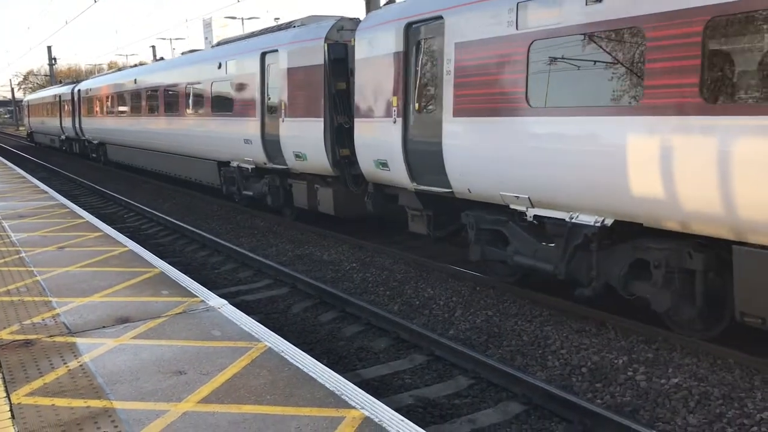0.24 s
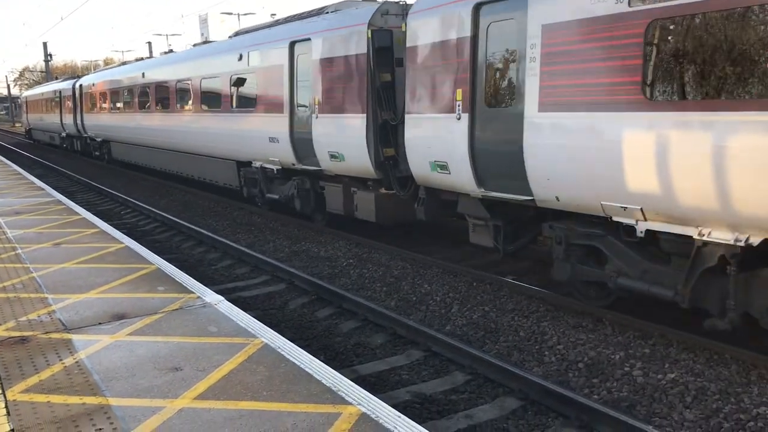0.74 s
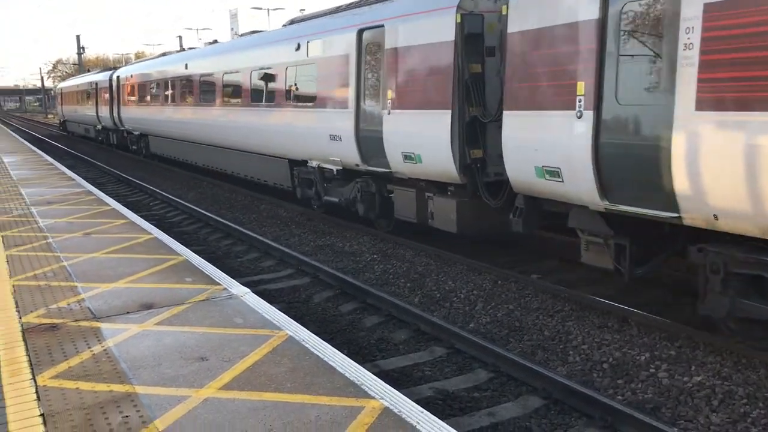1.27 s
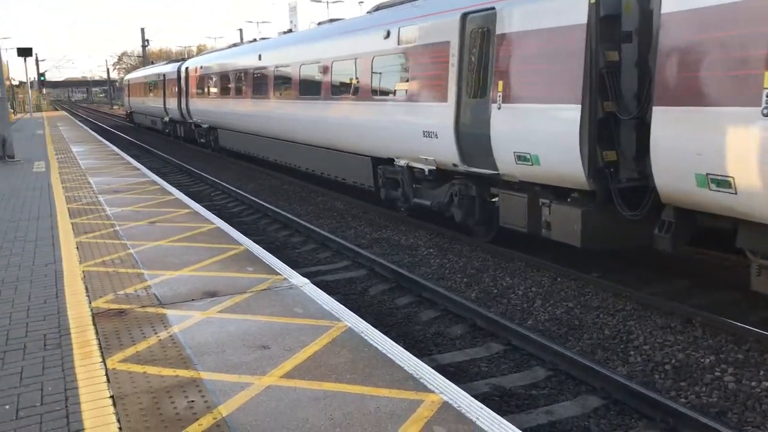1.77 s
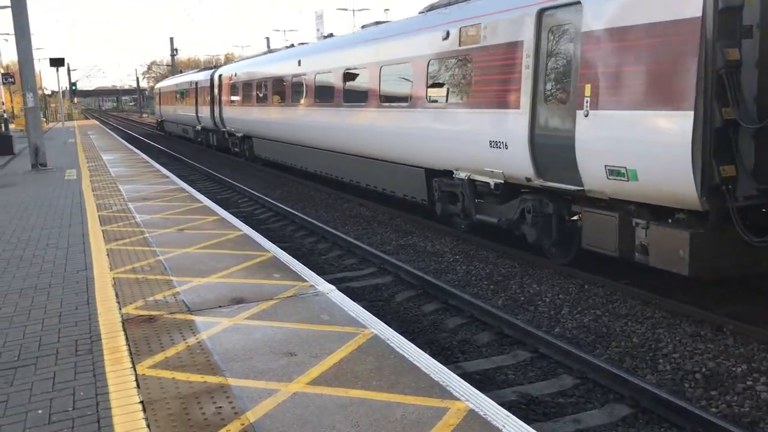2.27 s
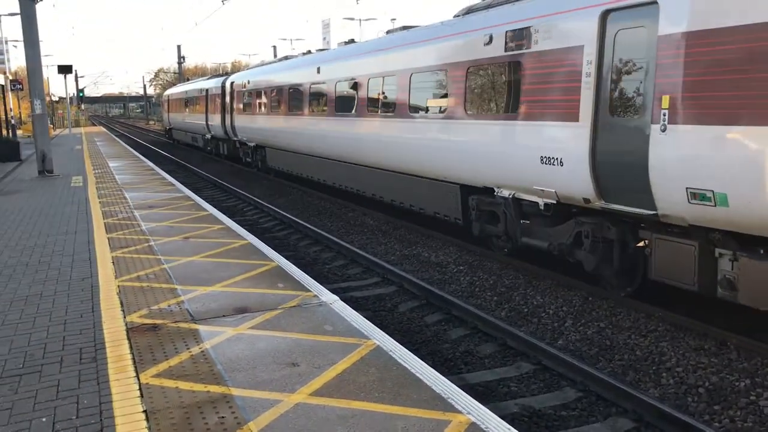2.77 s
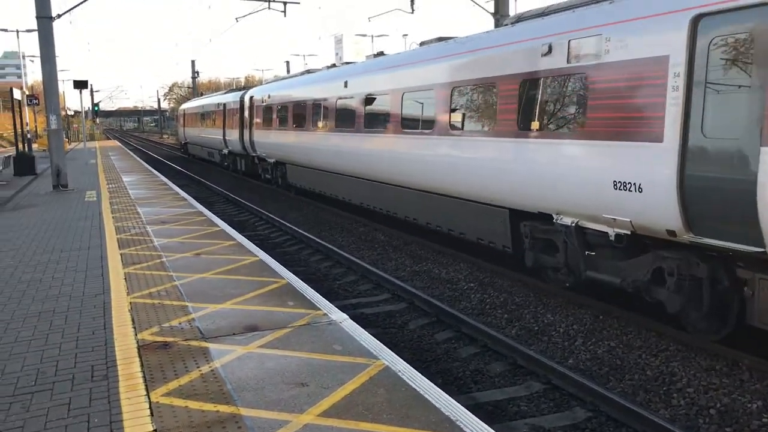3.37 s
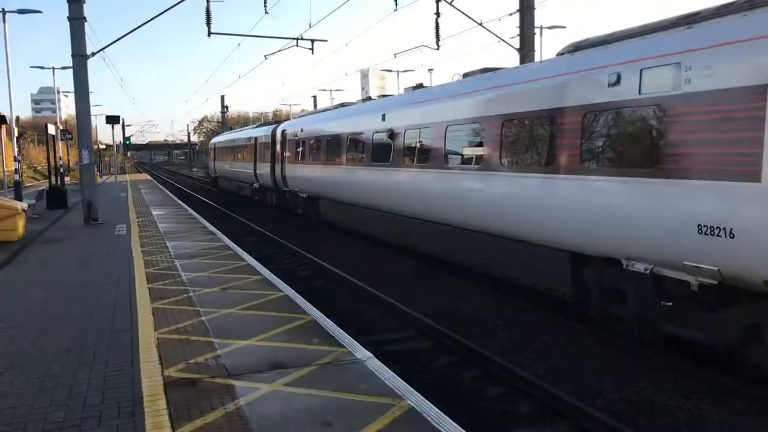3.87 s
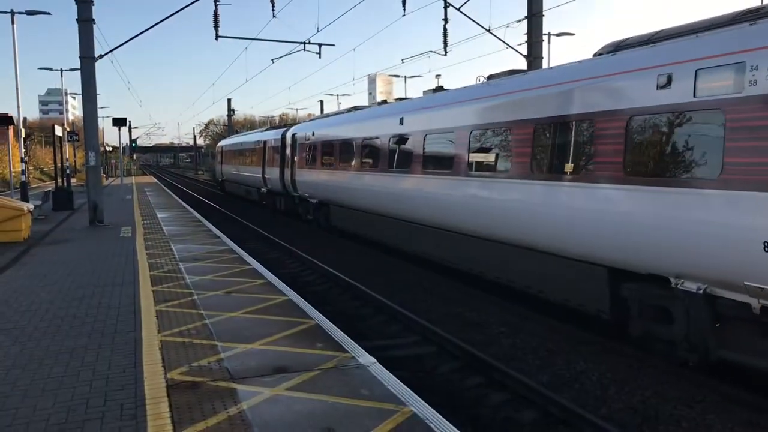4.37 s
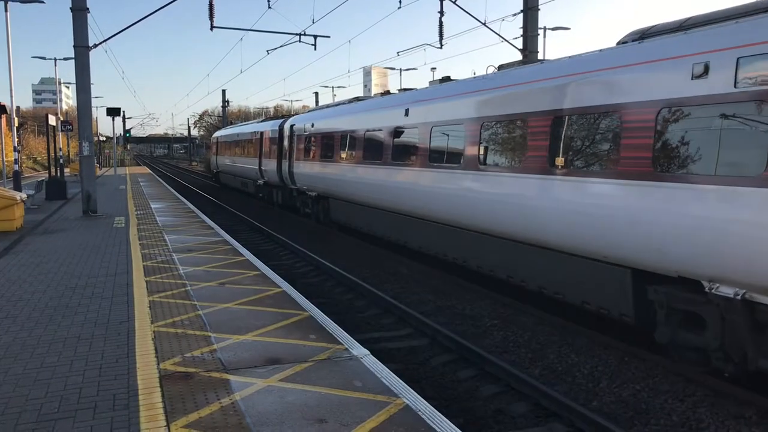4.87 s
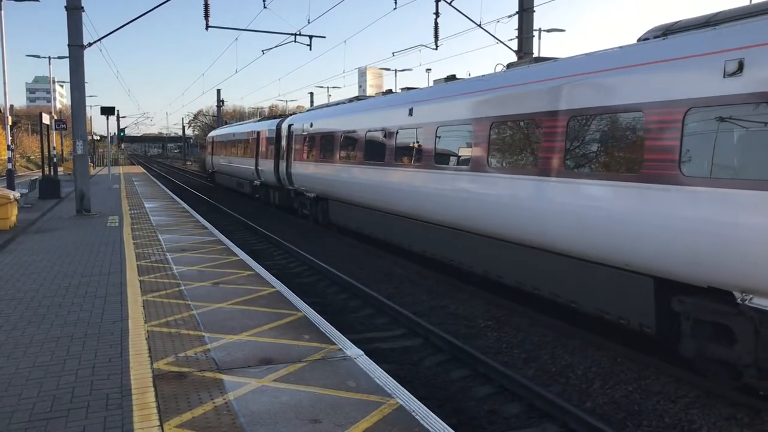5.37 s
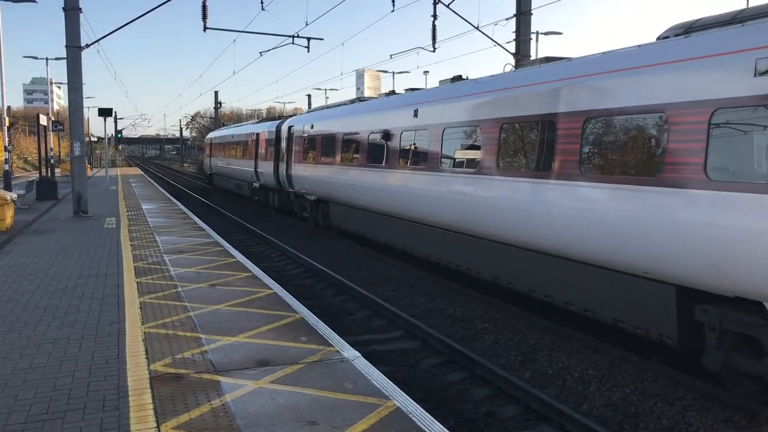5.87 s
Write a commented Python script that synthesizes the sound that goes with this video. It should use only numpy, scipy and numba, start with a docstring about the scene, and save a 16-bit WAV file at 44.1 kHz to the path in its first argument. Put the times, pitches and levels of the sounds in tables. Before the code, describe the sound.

A passenger train brakes past an open station platform. Dozens of short wavering squeaks merge into one continuous shrill squeal with scraping and thin hiss, single chirps standing out. Wind thumps the microphone in a cluster early on and again midway. Soft wheel rumble and a barely audible motor whine lie beneath. Toward the end the squeal loosens into lower, wandering notes. Close phone microphone, mono, very short echo.

```python
"""A station platform: a passenger train brakes along it, heard by a phone with one microphone.
Dozens of brake pads squeak at once in short wavering whistles that merge into one high squeal, over
the scrape of pads that catch no pitch; single squeaks and wandering held notes stand out.
Gusts buffet the microphone in low thumps (damped swings and airflow noise), the wheels rumble as
smooth shaped noise, and the traction gear whines faintly as three steady tones."""
import sys
import numpy as np
from scipy import signal
from scipy.fft import rfft, irfft
from scipy.io import wavfile
from scipy.ndimage import uniform_filter1d
from numba import njit

SR = 44100
rng = np.random.default_rng(int(sys.argv[2]) if len(sys.argv) > 2 else 0)


def pcm_store(signal):
    """Save signal as 16-bit PCM."""
    levels = np.round(np.clip(np.atleast_2d(signal), -1, 1) * 32767)
    wavfile.write(sys.argv[1], SR, levels.astype(np.int16).T)


N = 270774


def undb(db):
    """Decibels to gain."""
    return 10 ** (np.asarray(db) / 20)


def unit(x):
    """Scale to an RMS of 1."""
    return x / np.sqrt(np.mean(x ** 2))


def curves(table):
    """Columns of a curve table, one value a sample."""
    s, *columns = np.transpose(table)
    return [np.interp(np.arange(N) / SR, s, column) for column in columns]


def db_at(spectrum, hz):
    """Read a spectrum table at any pitch, along a logarithmic frequency axis."""
    points, db = np.transpose(spectrum)
    return np.interp(np.log(np.maximum(hz, 1)), np.log(points), db)


def colour(x, spectrum):
    """Shape a long sound by (frequency [Hz], level [dB]) points."""
    hz = np.arange(N // 2 + 1) * SR / N
    return irfft(rfft(x) * undb(db_at(spectrum, hz)), N)


def walk(rate):
    """Random levels of RMS 1, held 1 / rate s and slewed twice."""
    k = int(SR / rate)
    steps = np.repeat(rng.standard_normal(N // k + 1), k)
    return unit(uniform_filter1d(uniform_filter1d(steps, k), k)[:N])


THIRD_DB = -3  # third harmonic of a squeak relative to its second
# What reaches the phone of the upper partials: (frequency [Hz], relative level [dB])
OVERTONES = [(3710, -9), (6300, -13), (6670, -10.5), (7170, 1), (8720, 2.5), (9890, 0.5), (10600, -11.5),
             (11200, -10), (14500, -12), (15700, -15)]
OVERTONE_DB, UPPER_FLICKER_DB = -38.5, 1.93  # level at the start; depth of the treble flicker
RUB_DB, SIZZLE_DB = -5.5, -42  # scrape against the crowd curve; hiss before it follows the crowd


def brakes():
    """Brake pads stick and slip into a crowd of squeaks, clear notes, scraping and treble hiss."""
    slowing = np.linspace(0, 1, N) ** 2
    wobble, tremble = 1 + 0.00553 * walk(90), undb(1.72 * walk(70))
    level_db, high_db, low_db = crowd_levels()
    crowd_low, crowd_high = crowd(high_db, low_db, slowing, wobble, tremble, level_db)
    clear_low, clear_high = clear_notes(slowing, wobble, tremble)
    partials = unit(colour(crowd_high + 0.73 * clear_high, OVERTONES))
    upper = undb(OVERTONE_DB - 2.7 * slowing) * partials
    scrape = undb(RUB_DB + level_db - 4 * slowing) * rubbing(.45 * high_db, low_db)
    hiss = undb(SIZZLE_DB + 0.2 * (level_db - level_db.mean())) * sizzle()
    treble = undb(UPPER_FLICKER_DB * walk(9)) * (upper + hiss)
    return crowd_low + clear_low + scrape + treble


# The crowd of pads before trim and flicker; only the movement of the last two columns counts:
# (time [s], level [dB], highest pads [dB], lowest pads [dB])
CROWD = [(0.0, -25, -3, -21), (0.15, -27, -8, -17.5), (1.08, -21.5, -7, -21.5), (1.13, -23.5, -14.5, -14.5),
         (1.49, -24, -7, -14), (2.17, -22.5, -14.5, -17.5), (2.5, -24.5, -10, -13),
         (2.56, -23, -12.5, -18.5), (3.25, -23, -5, -21), (3.79, -20, -12.5, -25.5),
         (4.34, -22.5, -10.5, -15), (4.86, -24.5, -17, -11.5), (5.01, -25, -15, -21), (5.03, -25, -13, -9),
         (5.23, -21.5, -24.5, -19), (5.88, -22, -30, -15.5), (6.07, -20, -19, -23), (6.14, -25, -19, -7)]
SURGE_DB, FRINGE_DB = 0.52, 2.5  # how far the level and the two edges of the crowd flicker


def crowd_levels():
    """The edges of the crowd come and go as different bogies pass."""
    level_db, high_db, low_db = curves(CROWD)
    level_db = level_db + SURGE_DB * walk(14)
    high_db = high_db - high_db.mean() + FRINGE_DB * walk(12)
    low_db = low_db - low_db.mean() + FRINGE_DB * walk(12)
    return level_db, high_db, low_db


# How strongly the pads sing at each pitch: (frequency [Hz], relative level [dB])
PADS = [(1710, -55), (2900, -28.5), (3120, -25.5), (3260, -23.5), (3610, -9.5), (4060, -3), (4230, -0.5),
        (4960, -2.5), (5200, -5), (5430, -4.5), (6500, -27), (8450, -101), (14300, -120)]
CROWD_PER_S, CROWD_TRIM_DB = 900, -2.5  # squeaks drawn, before some fall silent; whistles against the curve


def crowd(high_db, low_db, slowing, wobble, tremble, level_db):
    """Short random squeaks: as the discs slow, fewer pads sing but each holds its note longer."""
    chance = rng.random((int(CROWD_PER_S * N / SR), 8)).T
    s = chance[0] * (N / SR + .1) - .1
    hz = 2900 + 3600 * chance[1]
    at = np.clip(s * SR, 0, N - 1).astype(int)
    high, low = edges(hz)
    db = db_at(PADS, hz) + 3.3 * chance[2] + high * high_db[at] + low * low_db[at]
    length = (.015 + .03 * chance[5]) * (1 + .8 * slowing[at])
    db[chance[7] < .45 * slowing[at]] = -200  # ever fewer pads sing
    bend = 1 + .045 * (1 + .7 * slowing[at]) * (chance[3:5] - .5)
    phase = 2 * np.pi * chance[6]
    rows = np.transpose([s, length, hz * bend[0], hz, hz * bend[1], undb(db), phase])
    low_part, high_part = whistle(rows, wobble, tremble, undb(THIRD_DB))
    swell = undb(level_db + CROWD_TRIM_DB) / np.std(low_part)
    return swell * low_part, swell * high_part


# Squeaks that stand out of the crowd, before their stutter:
# (time [s], length [s], pitch [Hz], level [dB])
SQUEAKS = [(0.21, 0.05, 4520, -24), (0.358, 0.11, 6150, -35), (0.521, 0.071, 6100, -26.5),
           (0.538, 0.061, 6230, -28), (0.73, 0.1, 3820, -37), (0.87, 0.055, 5970, -23),
           (0.894, 0.052, 3990, -21.5), (1.173, 0.065, 5870, -25.5), (1.225, 0.038, 3910, -22),
           (1.307, 0.041, 6070, -31), (1.354, 0.08, 5230, -27), (1.363, 0.046, 4720, -21),
           (1.366, 0.065, 5910, -30), (1.447, 0.054, 3960, -28.5), (1.506, 0.06, 5820, -29),
           (1.542, 0.054, 4650, -24), (1.554, 0.08, 5710, -28), (1.652, 0.047, 4780, -24),
           (1.695, 0.056, 5790, -20), (1.726, 0.083, 5410, -20), (1.824, 0.061, 3900, -28),
           (1.832, 0.03, 4840, -19), (1.86, 0.032, 3280, -32), (1.941, 0.033, 4320, -21),
           (2.024, 0.051, 3670, -29), (2.04, 0.045, 5330, -23), (2.264, 0.056, 4330, -22.5),
           (2.565, 0.032, 5070, -20), (2.611, 0.036, 5120, -18), (2.636, 0.034, 4970, -13.5),
           (2.743, 0.037, 4730, -20), (2.78, 0.076, 5180, -19.5), (2.848, 0.06, 5110, -18),
           (3.002, 0.047, 5250, -16.5), (3.02, 0.081, 5420, -20), (3.083, 0.039, 5300, -17.5),
           (3.208, 0.048, 4850, -17), (3.274, 0.048, 5850, -28), (3.295, 0.036, 5280, -20),
           (3.356, 0.046, 5120, -18), (3.468, 0.051, 4910, -25), (3.525, 0.046, 4580, -22),
           (3.573, 0.063, 5380, -20.5), (3.635, 0.093, 5270, -17.5), (3.812, 0.051, 5460, -26),
           (3.896, 0.04, 5310, -17), (3.933, 0.097, 5240, -21.5), (4.183, 0.038, 4070, -22.5),
           (4.384, 0.042, 4800, -21), (4.605, 0.098, 3270, -35), (4.614, 0.067, 4450, -28),
           (4.66, 0.12, 5710, -37), (4.771, 0.066, 3650, -20.5), (4.847, 0.031, 3130, -35),
           (5.055, 0.054, 3750, -23.5), (5.08, 0.068, 4270, -17.5), (5.165, 0.071, 3950, -22.5),
           (5.212, 0.091, 3670, -22.5), (5.301, 0.036, 3720, -18.5), (5.321, 0.069, 3460, -33),
           (5.536, 0.042, 3850, -20), (5.562, 0.063, 4260, -25), (5.608, 0.069, 4940, -29),
           (5.625, 0.062, 4710, -19), (5.764, 0.047, 4505, -27), (5.85, 0.12, 4270, -22),
           (5.874, 0.088, 5380, -30), (5.968, 0.046, 4130, -26), (5.99, 0.068, 5250, -27),
           (6.057, 0.061, 4960, -27)]
SQUEAK_BEND, SQUEAK_ARCH = .04, .022  # random tilt and lean of the ends, as shares of the pitch
CENTRE_HZ = 4900  # the ends lean towards this pitch
STUTTER_DB = 3.5  # how unevenly a clear squeak grips at speed


def clear_notes(slowing, wobble, tremble):
    """Single bent squeaks and held notes, whose grip stutters less as the train slows."""
    ends = 1 + SQUEAK_BEND * (rng.random((len(SQUEAKS), 2)) - .5)
    ends = ends + SQUEAK_ARCH * np.sign(CENTRE_HZ - np.array(SQUEAKS)[:, 2:3])
    rows = np.array([(t, length, hz * start, hz, hz * end, undb(db), 0.)
                     for (t, length, hz, db), (start, end) in zip(SQUEAKS, ends)])
    grip = tremble * undb(STUTTER_DB * (1 - 0.45 * slowing) * (walk(110) - .5))
    return np.array(whistle(rows, wobble, grip, undb(THIRD_DB))) + held(wobble, grip)


@njit
def whistle(rows, wobble, tremble, third):
    """Each row swells, bends through three pitches and fades; fundamentals and upper partials apart."""
    low, high = np.zeros(N), np.zeros(N)
    for s, length, a, b, c, gain, phase in rows:
        i0, n = int(s * SR), int(length * SR)
        for j in range(max(0, -i0), min(n, N - i0)):
            u = j / n
            own = (i0 + j + n * 7) % N  # the length picks which stretch of wavering a squeak gets
            hz = a * (1 - u) * (1 - 2 * u) + 4 * b * u * (1 - u) + c * u * (2 * u - 1)
            phase += 2 * np.pi * hz * wobble[own] / SR
            z = np.exp(1j * phase)  # its powers are the harmonics
            g = gain * np.sin(np.pi * u) ** .45 * tremble[own]
            low[i0 + j] += g * z.imag
            high[i0 + j] += g * ((z * z).imag + third * (z * z * z).imag)
    return low, high


# Pads that hold a wandering note as the train slows, before rounding and stutter, one curve each:
# (time [s], pitch [Hz], level [dB])
HELD = [
    [(0.66, 5780, -35), (0.84, 5800, -33), (1.07, 5800, -25.5), (1.13, 5800, -40), (1.2, 5840, -36),
     (1.3, 5900, -37), (1.48, 5830, -30), (1.64, 5650, -36), (1.72, 5770, -32), (1.8, 5800, -45),
     (1.94, 5760, -26), (2.06, 5600, -34)],
    [(4.22, 5620, -18), (4.3, 5340, -34), (4.4, 5020, -30), (4.5, 5060, -23.5), (4.56, 5280, -25.5),
     (4.605, 4880, -23), (4.66, 4880, -17), (4.71, 5240, -21), (4.8, 5285, -32), (4.875, 5040, -21),
     (4.95, 5130, -26), (5.03, 5270, -20.5), (5.08, 4760, -21), (5.13, 4870, -27), (5.17, 5110, -21),
     (5.24, 5170, -28), (5.29, 4830, -32)],
    [(5.15, 5770, -35), (5.23, 5770, -28), (5.32, 5850, -36), (5.45, 5840, -40), (5.54, 5780, -32.5),
     (5.63, 5720, -40), (5.86, 5780, -40)],
    [(5.015, 3540, -22), (5.045, 3330, -26), (5.085, 3350, -25), (5.115, 3540, -26)],
    [(5.2, 4240, -28), (5.26, 4060, -29), (5.34, 4230, -28), (5.42, 4420, -14)],
    [(5.49, 3700, -25), (5.56, 3580, -28), (5.6, 3160, -41)],
    [(5.59, 3510, -19), (5.64, 3630, -30), (5.73, 3740, -35)],
    [(5.66, 4840, -23), (5.7, 5090, -37), (5.75, 5110, -22), (5.84, 4980, -24)],
    [(5.87, 3550, -37), (5.93, 3090, -34), (6.0, 3100, -37)],
    [(6.06, 3700, -36), (6.1, 3480, -35), (6.14, 3440, -29)],
]
HELD_FADE_S = 0.018


def held(wobble, grip):
    """Each held note follows its curve, rounded at the corners; fundamentals and upper partials apart."""
    t, low, high = np.arange(N) / SR, 0, 0
    for k, note in enumerate(HELD):
        hz, db = (uniform_filter1d(c, int(HELD_FADE_S * SR)) for c in curves(note))
        on = np.clip(np.minimum(t - note[0][0], note[-1][0] - t) / HELD_FADE_S, 0, 1)
        shift = k * SR // 3  # so that the notes do not waver together
        gain = on * undb(db) * np.roll(grip, shift) ** 1.15
        phase = 2 * np.pi * np.cumsum(hz * np.roll(wobble, shift)) / SR
        low = low + gain * np.sin(phase)
        high = high + gain * (np.sin(2 * phase) + undb(THIRD_DB) * np.sin(3 * phase))
    return np.array([low, high])


def edges(hz):
    """How much a pitch belongs to the highest and to the lowest pads, 0-1."""
    return np.clip((hz - 5250) / 250, 0, 1), np.clip((3900 - hz) / 250, 0, 1)


def rubbing(high_db, low_db):
    """Pads that scrape without catching a pitch: noise in the same band, with moving edges."""
    noise = rfft(unit(colour(rng.standard_normal(N), PADS)))
    high, low = edges(np.arange(len(noise)) * SR / N)
    middle = irfft(noise * (1 - high - low), N)
    return middle + undb(high_db) * irfft(noise * high, N) + undb(low_db) * irfft(noise * low, N)


def sizzle():
    """The scrape above the whistles flickers quickly, band by band."""
    hz, out = np.arange(N // 2 + 1) * SR / N, 0
    noise = rfft(colour(rng.standard_normal(N), OVERTONES))
    shared_db = 1.5 * walk(12)
    for centre in np.arange(6000, 16600, 600):
        band = irfft(noise * np.clip(1 - abs(hz - centre) / 600, 0, 1), N)
        out = out + undb(shared_db + 3.5 * walk(30)) * band
    return unit(out)


STATION_T60_S, STATION_DB = .2, -14  # echo decay time; echo level against the direct sound


def station(x):
    """Short diffuse echo from coach sides, track bed and platform: decaying noise after 6 ms."""
    t = np.arange(SR // 2) / SR
    tail = rng.standard_normal(len(t)) * undb(-60 * t / STATION_T60_S) * (t > .006)
    return x + undb(STATION_DB) * signal.fftconvolve(x, tail / np.linalg.norm(tail))[:N]


def wind():
    """Eddies and airflow together, without the slowest swings or the treble."""
    wind_band = signal.butter(3, [38, 1800], "bandpass", fs=SR, output="sos")
    return signal.sosfilt(wind_band, buffets() + gust())


# Buffets on the microphone, before the band limit: (time [s], level [dB], eddy frequency [Hz], sharp edge
# relative to level [dB])
BUFFETS = [(0.185, -11, 245, -12), (0.207, -21, 151, -8), (0.22, -20, 340, -19), (0.257, -30, 126, -23),
           (0.296, -19.5, 99.6, 0), (0.317, -9.5, 163, -0.5), (0.334, -13, 235, -20),
           (0.364, -13, 185, -15), (0.388, -10.5, 187, -20), (0.407, -21.5, 119, 8.5),
           (0.461, -16.5, 162, -10), (0.472, -16.5, 320, -12), (0.525, -10.5, 221, -15),
           (0.538, -20, 147, 3.5), (0.551, -16, 220, -25), (0.665, -19, 125, 1), (0.681, -18, 78, -10),
           (0.698, -14.5, 133, 7), (0.704, -13.5, 204, 2), (0.734, -42, 59.2, -34), (1.839, -15, 192, -34),
           (1.868, -22, 115, -23), (2.351, -25.5, 104, -30), (2.543, -23.5, 72.7, -50),
           (2.686, -19, 168, -3.5), (2.699, -21.5, 80, -1.5), (3.197, -20.5, 64, 5.5),
           (3.215, -11, 110, -25), (3.228, -10, 150, -9), (3.248, -17, 180, -19), (3.267, -13.5, 260, -9),
           (3.32, -24, 137, -20), (3.343, -13.5, 144, -8), (3.368, -17, 215, -9), (3.388, -13, 230, -12),
           (3.414, -15, 229, -5), (3.435, -16, 240, -5), (3.455, -17, 116, -17), (3.478, -25, 56.5, -30),
           (3.504, -26, 178, -20), (3.53, -28, 150, -15), (4.031, -25, 150, -4), (5.673, -23.5, 150, 1),
           (5.718, -21.5, 75, -9), (5.761, -23, 116, -10), (5.847, -24, 122, -8), (5.874, -23, 228, -12),
           (5.886, -23.5, 90.5, -15), (5.934, -31, 121, -6)]


def buffets(turns=0.49, edge_s=0.00064, late_s=0.00577, body_db=-1):
    """Each eddy is one or two slack swings of pressure with a sharp snap near the front."""
    out, t = np.zeros(N + SR), np.arange(SR // 10) / SR
    chance = rng.random((len(BUFFETS), 3))
    for (s, db, hz, edge_db), (sign, phase, pitch) in zip(BUFFETS, chance):
        u = t * hz / turns
        envelope = np.sign(sign - .5) * np.e * u * np.exp(-u)
        swing = envelope * np.sin(2 * np.pi * hz * t * (1 - 2.0 * t))  # slackens in pitch
        snap = np.tanh(t / edge_s) * np.exp(-((t - late_s) / edge_s) ** 2 / 2)
        edge = snap * np.sin(2 * np.pi * ((400 + 200 * pitch) * t + phase))
        i0 = int(s * SR)
        out[i0:i0 + len(t)] += undb(db) * (undb(body_db) * swing + undb(edge_db) * edge)
    return out[:N]


# Gusts over the port, before puffs and band limit: (start [s], hold [s], airflow level [dB], flutter relative
# to airflow [dB])
GUSTS = [(0.0, 0.044, -33.5, -7), (0.208, 0.069, -28, -8), (0.317, .095, -27, 6.5), (0.462, .11, -29, -1.5),
         (0.666, 0.048, -21.5, 3), (0.73, 0.079, -34, -30), (1.192, 0.12, -33.5, -19),
         (1.245, 0.48, -60, 16.5), (1.827, 0.045, -29, -10), (2.69, 0.061, -31, -8),
         (2.81, 0.32, -36.5, -12), (3.212, 0.058, -21.5, 0.5), (3.31, 0.19, -25, -1.5),
         (3.613, 0.029, -35, -17), (3.814, 0.1, -30.5, -21), (4.0, 0.4, -51, -4), (4.909, 0.52, -60, 14.5),
         (5.667, 0.025, -35.5, 3.5), (5.72, 0.034, -44, -2), (5.845, 0.11, -35.5, -8)]
GUST_RISE_S, GUST_FALL_S, CALM_DB, CALM_FLUTTER_DB = 0.012, 0.026, -38.5, -46


def gust():
    """Low airflow noise rises, holds and dies with each gust; its flutter comes in uneven puffs."""
    t = np.arange(N) / SR
    air_gain, flutter_gain = undb(CALM_DB), undb(CALM_FLUTTER_DB)
    for s, hold, db, flutter_db in GUSTS:
        ramp = np.minimum((t - s) / GUST_RISE_S, (s + hold - t) / GUST_FALL_S)
        shape = np.exp(np.minimum(0, ramp))
        air_gain = air_gain + undb(db) * shape
        flutter_gain = flutter_gain + undb(db + flutter_db) * shape ** 4
    # both spectra: (frequency [Hz], relative level [dB])
    air_spectrum = [(15, -37), (40, -6.0), (70, 1), (130, -5.0), (220, -13.5), (500, -45.0)]
    flutter_spectrum = [(120, -36), (230, 8.5), (500, -2.5), (800, -19), (1400, -36.5)]
    air = unit(colour(rng.standard_normal(N), air_spectrum))
    flutter = unit(colour(rng.standard_normal(N), flutter_spectrum))
    air = undb(-4.0 + 2.0 * walk(17)) * air_gain * air
    return air + undb(-6.0 + 4.6 * walk(40)) * flutter_gain * flutter


# Spectrum of wheels, fans and far traffic: (frequency [Hz], relative density [dB per Hz])
ROLL = [(15, -45), (30, -8.5), (75, -5.5), (169, -15.5), (307, -11), (450, -18), (1060, -14.5),
        (1600, -20.5), (2720, -26), (6500, -50), (15700, -76)]
ROLL_DB = -41  # RMS level around which it swells


def rolling():
    """Wheels, fans and far traffic: smooth noise that swells a little as the train draws past."""
    swell_db = np.linspace(-.6, .6, N) + .5 * walk(3.0)
    return undb(ROLL_DB + swell_db) * unit(colour(rng.standard_normal(N), ROLL))


# RMS level of the traction whine: (time [s], level [dB])
WHINE = [(0.0, -66), (0.73, -63), (1.35, -68), (1.59, -55), (2.62, -58), (2.75, -66), (3.21, -52),
         (4.1, -59), (4.24, -69), (4.33, -56), (5.01, -60), (5.68, -59), (5.75, -68), (6.14, -62)]
# Sidebands at twice the mains, before wavering: (offset from the whine [Hz], level [dB])
SIDE_TONES = [(-100, -65), (100, -67)]
WHINE_HZ = 1849


def traction():
    """The traction gear's thin whine: a steady sine with a wavering sideband on each side."""
    def tone(hz):
        """Sine of RMS 1."""
        return np.sqrt(2) * np.sin(2 * np.pi * hz * np.arange(N) / SR)

    db, = curves(WHINE)
    sides = sum(undb(side_db + 3 * walk(1.5)) * tone(WHINE_HZ + offset) for offset, side_db in SIDE_TONES)
    return undb(db) * tone(WHINE_HZ) + sides


def scene():
    """Only the brakes carry the station echo; both channels are the same."""
    mono = station(brakes()) + wind() + rolling() + traction()
    return np.array([mono, mono])


def record(dry):
    """The phone cuts the top, steeply above 15780 Hz."""
    return signal.sosfilt(signal.ellip(16, .2, 70, 15780, fs=SR, output="sos"), dry)


dry = scene()
out = record(dry)
pcm_store(out)
```